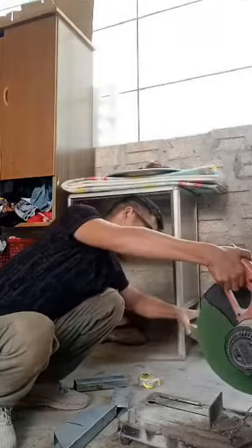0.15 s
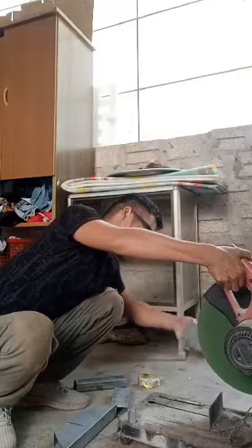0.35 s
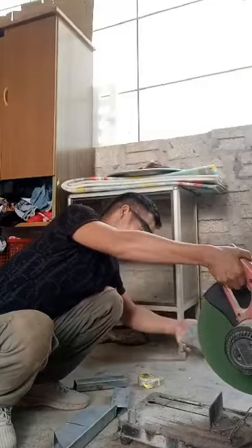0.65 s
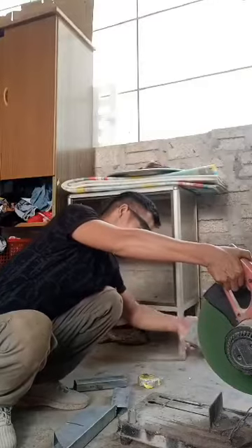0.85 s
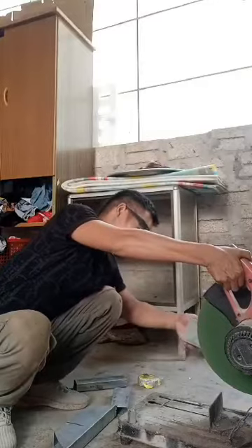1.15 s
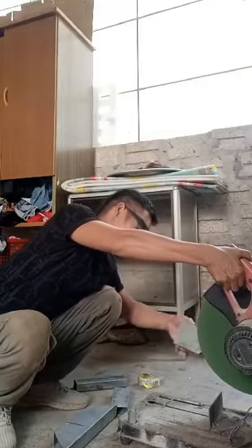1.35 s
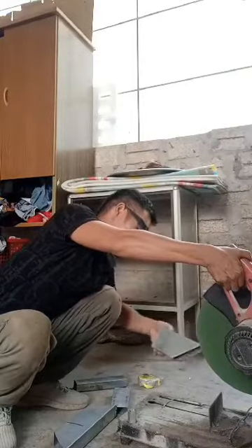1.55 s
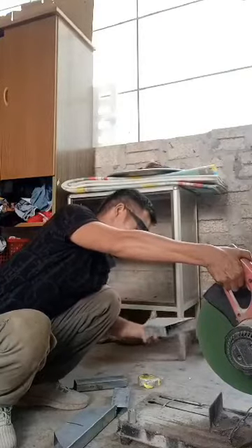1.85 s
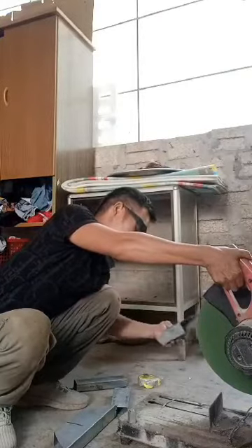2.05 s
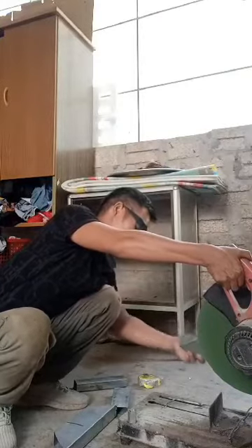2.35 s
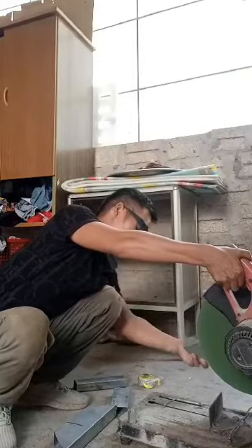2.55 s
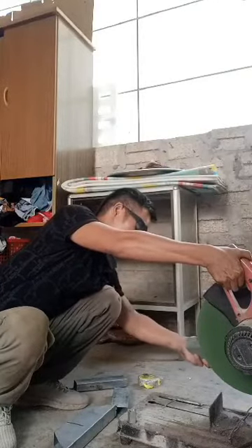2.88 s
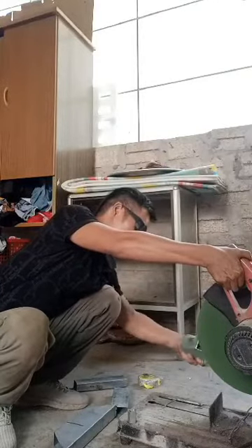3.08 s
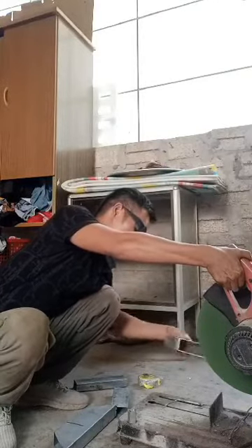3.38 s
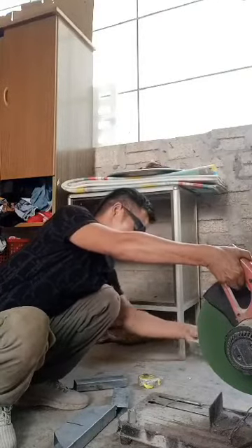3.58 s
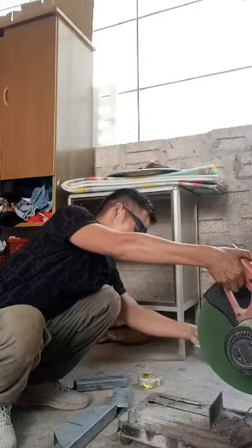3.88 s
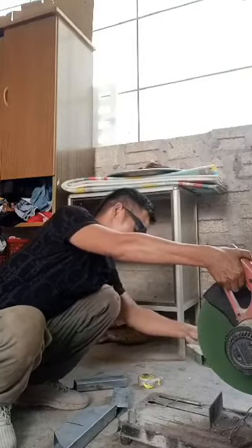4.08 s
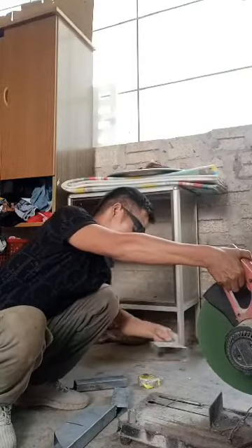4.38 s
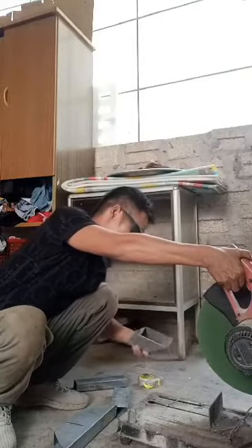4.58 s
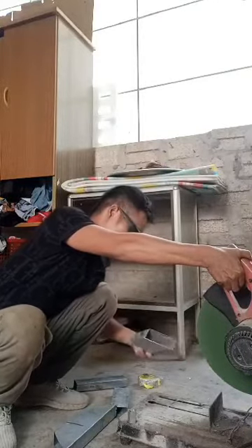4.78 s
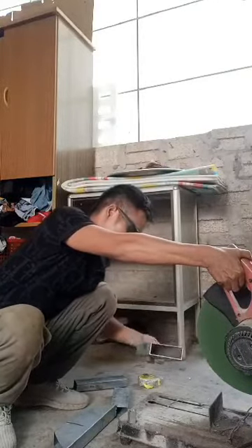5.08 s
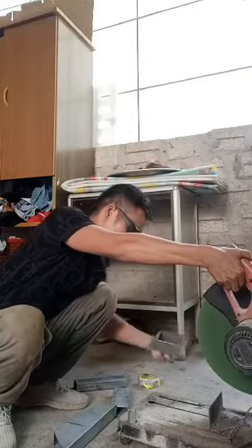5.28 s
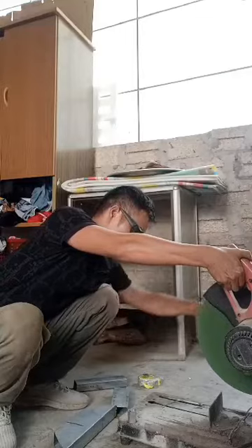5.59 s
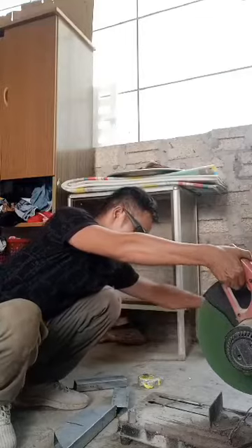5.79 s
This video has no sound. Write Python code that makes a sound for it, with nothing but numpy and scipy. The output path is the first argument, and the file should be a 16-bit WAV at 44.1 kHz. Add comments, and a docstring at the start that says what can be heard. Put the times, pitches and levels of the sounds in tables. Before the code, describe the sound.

In a small workshop, a steel tube scrapes briefly against the spinning wheel of a cut-off saw. The motor is blipped on with a thump and a rising whine, then coasts with a fast rattle. Three such blips are each followed by another hissing, ringing, squealing pass of the tube. The saw then rattles on alone until a fourth blip. The sound is in stereo and seems close.

```python
"""An abrasive cut-off saw is coasting in a small workshop, a steel tube pressed against its wheel:
grit hisses, the tube rasps, rings and squeals, and the frame rumbles. The tube is drawn back, and the
slack drive rattles in surges as it slows. Then the motor is switched on for a blip, which jolts the
housing and winds up the gear whine and the rush of air. Three such blips are each followed by another
pass of the tube. After the last pass the saw coasts and rattles, until a fourth blip ends the scene."""
import sys
import numpy as np
from scipy import signal
from scipy.fft import rfft, irfft
from scipy.io import wavfile
from scipy.ndimage import uniform_filter1d, map_coordinates

SR = 44100
rng = np.random.default_rng(int(sys.argv[2]) if len(sys.argv) > 2 else 0)


def dump_mix(stems):
    """Bounce the given channels to the path in sys.argv[1] as a 16-bit WAV at rate SR."""
    frames = np.atleast_2d(stems).T  # one column per channel
    limited = np.clip(frames, -1, 1)  # hard clip at full scale
    pcm = np.round(limited * 32767).astype(np.int16)
    wavfile.write(sys.argv[1], SR, pcm)


N = 261954
T = np.arange(N) / SR
HZ = np.fft.rfftfreq(N, 1 / SR)


def amp(db):
    """Amplitude ratio of a level in decibels."""
    return 10 ** (np.asarray(db) / 20)

def follow(points):
    """Linear interpolation of (time, value) points at every sample."""
    return np.interp(T, *np.transpose(points))

def spectrum(points):
    """Interpolation of (frequency, value) points on a logarithmic frequency axis."""
    hz, value = np.transpose(points)
    return np.interp(np.log(HZ + 1), np.log(hz + 1), value)

def modes(rows):
    """Modal superposition: second-order resonances summed with alternating sign."""
    return sum((-1) ** k * amp(db) * 1j * HZ * width / (hz ** 2 - HZ ** 2 + 1j * HZ * width)
               for k, (hz, width, db) in enumerate(rows))

def wander(rate_hz):
    """Random modulation: low-passed noise of rms 1."""
    x = irfft(rfft(rng.standard_normal(N)) / (1 + (HZ / rate_hz) ** 4), N)
    return x / x.std()

def wander_pair(rate_hz):
    """Two independent random modulations."""
    return np.array([wander(rate_hz), wander(rate_hz)])

def noise():
    """Two uncorrelated white noises."""
    return rng.standard_normal((2, N))

def levelled(x, seconds):
    """Division by the running rms, so that the driving force alone sets the level."""
    return x / np.sqrt(abs(uniform_filter1d(x.mean(0) ** 2, int(seconds * SR) + 1)) + 1e-9)

def swell(start, rise, hold, fall):
    """Envelope with a linear rise, and exponential decay from `hold` seconds after its start."""
    return np.clip((T - start) / rise, 0, 1) * np.exp(-np.clip((T - start - hold) / fall, 0, 50))

# Balance of the two microphone ports: (frequency [Hz], left minus right [dB])
PORT_BALANCE = [(60, .5), (280, .5), (420, 2.7), (600, 0.1), (990, -1), (1650, 2), (2750, 3.3), (4000, 4),
                (4850, 2.7), (5200, 6.5), (5800, 10.5), (6500, 10.5), (7300, 4.5), (7800, -2), (8700, -10),
                (9800, -6), (12000, 0.3)]
# Likeness of the two ports: (frequency [Hz], coherence [0-1])
PORT_COHERENCE = [(50, .3), (150, .35), (350, .85), (550, .6), (900, .35), (1400, .45), (2500, .3),
                  (4500, .05), (13000, 0)]
def heard(pair, response=1, normalise=True):
    """Partial coherence: two signals are filtered and mixed to stereo, by default to a mid rms of 1."""
    a, b = rfft(pair) * response
    coherence, tilt_db = np.clip(spectrum(PORT_COHERENCE), 0, 1), spectrum(PORT_BALANCE)
    left = a * amp(tilt_db / 2)
    right = (coherence * a + np.sqrt(1 - coherence ** 2) * b) * amp(-tilt_db / 2)
    x = irfft(np.array([left, right]), N)
    return x / x.mean(0).std() if normalise else x

def speed(first_hz=470.6, coast_s=7.94, cut_drag_per_s=.083):
    """Motor turns per second: each start winds them up; drag, greater in a cut, makes them decay."""
    grinding_s = sum(np.clip(T - start, 0, end - start) for start, _, end, *_ in PUSHES)
    slowing = T / coast_s + cut_drag_per_s * grinding_s
    hz = first_hz * np.exp(-slowing)
    for start, _, _, top_hz, spin_up, *_ in STARTS:
        wound = np.clip((T - start) / spin_up, 0, 1)
        lost = np.maximum(slowing - np.interp(start + spin_up, T, slowing), 0)
        hz = (1 - wound) * hz + wound * top_hz * np.exp(-lost)
    return hz

def with_speed(exponent, nominal_hz=473):
    """Power law of amplitude against motor speed."""
    return (speed() / nominal_hz) ** exponent

def powered():
    """Extra excitation while the motor draws current."""
    return sum(amp(db) * swell(start - CLASH_LEAD_S, 0.018, spin_up, 0.11)
               for start, _, _, _, spin_up, db, _ in STARTS)

# Modes of the sheet-metal casing: (frequency [Hz], bandwidth [Hz], gain [dB])
CASING_MODES = [(1800, 49, 1.5), (1966, 30, 0.5), (2170, 33, 1.5), (2370, 45, 0), (2786, 37, 2),
                (3230, 61, 0.5), (3475, 80, 0), (3830, 60, 0), (4100, 26, -18), (4970, 30, 1),
                (5600, 54, -3), (6040, 54, -3)]
def casing():
    """Resonant transmission: sound from inside the machine picks up the ring of its casing."""
    return np.sqrt(1 + 2 * abs(modes(CASING_MODES)) ** 2)

# Spectrum of the rushing air: (frequency [Hz], relative level [dB])
AIR_SPECTRUM = [(30, -44), (95, -12.5), (140, -14.5), (300, -9), (420, 0), (750, -0.5), (1200, -2.5),
                (1850, -5.5), (2350, -3), (2600, -5), (2800, -2.5), (3450, -1), (3900, -.5), (5000, .5),
                (5900, 0), (7000, -3), (8000, -21.5), (8900, -12), (10000, -29.5), (13000, -52)]
def air(level_db=-30):
    """Turbulence at fan and wheel makes broadband noise, growing with speed and under current."""
    rush = np.hypot(amp(level_db) * with_speed(1.33), powered())
    flutter = amp(.6 * wander(60))
    return rush * flutter * heard(noise(), amp(spectrum(AIR_SPECTRUM)) * casing())

# Armature harmonics, from the seventh upward: (relative level [dB])
ARMATURE_HARMONICS = [3, 7.5, 1, 0, -10, -18, -4.5]
def armature(turns, level_db=-43, fading_db=8):
    """A harmonic series glides with the motor; each tone fades at random, as if crossing room modes."""
    tones = np.zeros((2, N))
    for order, db in enumerate(ARMATURE_HARMONICS, 7):
        fading = amp(db + fading_db * wander(5))
        tones += fading * np.cos(2 * np.pi * (order * turns + rng.random((2, 1))))
    return amp(level_db) * heard(tones)

# Tones of rotor and fan: (frequency [multiple of motor speed], level at nominal speed [dB])
ROTOR_TONES = [(1.197, -45.5), (1.888, -53), (2.394, -55.5)]
def rotor(turns):
    """Rotational tones waver, sag with the speed and grow as its cube."""
    tones = np.zeros((2, N))
    for order, db in ROTOR_TONES:
        phase = 2 * np.pi * order * turns + 1.2 * wander_pair(25)
        tones += amp(db + 4 * wander(7)) * heard(np.cos(phase))
    return with_speed(3) * tones

def housing_rolloff(cutoff_hz=3500):
    """Low-pass radiation: the heavy housing gives off little treble."""
    return 1 / (1 + (HZ / cutoff_hz) ** 4)

# Modes of the motor housing: (frequency [Hz], bandwidth [Hz], gain [dB])
HOUSING_MODES = [(404.7, 4.2, -7), (465.3, 26, 0), (494.4, 38, -4.5), (561, 42, -8), (630.4, 17.4, -1),
                 (765, 25, -12.5), (870, 9.4, -12.5), (925, 7.6, -3.5), (1070, 54, -10)]
def drone(rattle, level_db=-36.5, braced_db=-10):
    """Forced vibration of the housing grows with speed, current and surges; the tube's bracing damps it."""
    brace = pressing(RUMBLE, growth=1, release=0.77)
    running = amp(level_db + braced_db * brace / brace.max()) * with_speed(1.2)
    kicks = surging(rattle, GEAR_RING, rise=0.01, hold=0.006, fall=0.017)
    shake = np.hypot(running, amp(-6) * np.hypot(powered(), kicks))
    return shake * levelled(heard(noise(), modes(HOUSING_MODES) * housing_rolloff()), 0.062)

# Modes of the wheel guard: (frequency [Hz], bandwidth [Hz], gain [dB])
GUARD_MODES = [(1274, 28, -11.5), (1354, 27, -1.5), (1441, 15.5, -5), (1486, 12.3, -2), (1543, 12, 2.5),
               (1612, 13.6, 2)]
# Course of the steady gear whine: (time [s], relative level [dB])
WHINE_LEVEL = [(0, -31.5), (.6, -29.5), (1.1, -30), (1.35, -36), (1.68, -31), (2.08, -30.5), (2.18, -23.5),
               (2.27, -26), (2.42, -31.5), (2.6, -25.5), (2.87, -24.5), (3.15, -27.5), (3.7, -26.5),
               (4.15, -30), (4.33, -39), (4.52, -28), (5.94, -29)]
def whine(turns, rattle, gear_order=3.12, direct=.16, knocking=.85):
    """Phase modulation: gear teeth mesh unevenly and ring the guard; the rattle drives them harder."""
    phase = 2 * np.pi * gear_order * turns + 1.4 * wander_pair(80)
    flutter = amp(2.5 * wander(25) - .4)
    mesh, guard = np.cos(phase), modes(GUARD_MODES)
    tone = heard(mesh, guard) + direct * heard(mesh) + knocking * heard(noise(), guard)
    octave = amp(-15) * heard(np.cos(2 * phase))
    steady = flutter * amp(follow(WHINE_LEVEL) - 5)
    kicks = amp(1) * surging(rattle, GEAR_RING, rise=0.0073, hold=0.019, fall=0.0092)
    return (levelled(tone, 0.074) + octave) * np.hypot(steady, kicks)

# Spells of rattle in the slack drive:
# (first surge [s], last surge [s], approximate rate [1/s], clatter [dB], gear ring [dB])
RATTLES = [ (0.39, .47, 14, -33, -46), (0.862, 0.891, 17, -24, -27), (1.076, 1.09, 17, -19, -31),
           (1.759, 1.756, 17, -30, -35), (1.88, 2.121, 16.6, -20.5, -32.5), (2.45, 2.756, 16.8, -18, -29.5),
           (2.807, 2.855, 18, -25, -25), (3.37, 3.553, 16.7, -19, -36), (4.438, 4.602, 18.3, -21.5, -29.5),
           (4.652, 4.986, 18.3, -24, -35), (5.02, 5.416, 17.4, -25.5, -38.5),
           (5.549, 5.799, 13.3, -32, -34), ]
CLASH_LEAD_S = 0.024  # the gears take up their slack just before each jolt
CLATTER, GEAR_RING = 1, 2  # level columns of a surge, after its time
def surges(jitter_s=.002, uneven_db=1.2, clash_ring_db=-27):
    """Backlash: the drive clashes once at each start and surges in nearly even trains as it slows."""
    events = [(start - CLASH_LEAD_S, clash_db, clash_ring_db) for start, *_, clash_db in STARTS]
    for first, last, per_s, clatter_db, ring_db in RATTLES:
        for time in np.linspace(first, last, round(abs(last - first) * per_s) + 1):
            late_s, harder_db, brighter_db = rng.standard_normal(3) * (jitter_s, uneven_db, uneven_db)
            events.append((time + late_s, clatter_db + harder_db, ring_db + brighter_db))
    return events

def surging(rattle, column, rise, hold, fall):
    """Convolution of the surge impulses with one envelope gives the rattle's strength over time."""
    rows = np.array(rattle)
    onsets = np.clip(rows[:, 0] * SR, 0, N - 1).astype(int)
    impulses = np.bincount(onsets, amp(rows[:, column]), N)
    return signal.oaconvolve(impulses, swell(0, rise, hold, fall)[:SR // 4])[:N]

# Spectrum of the knocks in the drive: (frequency [Hz], relative level [dB])
CLATTER_SPECTRUM = [(60, -22), (200, -17), (480, -22), (900, -14), (2000, 2), (3400, 7.5), (4700, 6),
                    (6300, 1), (7300, 2.5), (8000, -9), (9000, -3.5), (12000, -64)]
def clatter(rattle, level_db=-11):
    """Impact noise: each surge is a cluster of small knocks, merged into a rough burst."""
    uneven = amp(1.8 * wander(400))
    knocks = heard(noise() * uneven, amp(spectrum(CLATTER_SPECTRUM)) * casing())
    return amp(level_db) * surging(rattle, CLATTER, rise=.008, hold=.022, fall=.013) * knocks

def inrush_hum(level_db=-49, mains_hz=50):
    """Magnetic force pulls twice in each mains cycle, so the inrush of current hums briefly."""
    inrush = sum(swell(start, 0.057, 0.13, .03) for start, *_ in STARTS)
    pull = 2 * np.pi * 2 * mains_hz * T + wander(27)
    return amp(level_db) * inrush * (np.sin(pull) + np.sin(2 * pull))

# Motor starts: (time [s], jolt [dB], hold [s], speed reached [turns/s], spin-up [s],
# rush of air [dB], gear clash [dB])
STARTS = [ (0.634, -24.5, 0.023, 517, 0.18, -34.5, -33), (2.2, -23, 0.028, 540, .17, -27.5, -20),
          (3.646, -22.5, 0.028, 566, .22, -28, -17), (5.869, -22, 0.0083, 590, 0.19, -29.5, -28), ]
# Modes of the jolted housing: (frequency [Hz], bandwidth [Hz], gain [dB])
JOLT_MODES = [(100, 37, -34), (179, 12, -8), (385, 9.5, -17), (454, 83, 6), (610, 43, -5), (690, 60, 3.5)]
def jolts(boom_hz=464.4):
    """Transient excitation: the starting torque sets the housing booming in its lowest strong mode."""
    torque = sum(amp(db) * swell(start, 0.0052, hold, 0.027) for start, db, hold, *_ in STARTS)
    boom = heard(np.cos(2 * np.pi * boom_hz * T + .4 * wander_pair(30)))
    shudder = levelled(heard(noise(), modes(JOLT_MODES) * housing_rolloff()), 0.037)
    return torque * (0.93 * boom + 0.41 * shudder)

# Pushes of the tube against the wheel, with relative levels: (start [s], bite-in [s], end [s],
# growth [dB], grit [dB], rasp [dB], rumble [dB], ring [dB], squeal [dB], squeal pitch [Hz],
# place of contact [0 rim, 1 corner, 2 flank])
PUSHES = [ (0.0, 0.0015, .285, 1.5, -23, -29, -53, -16.5, -26.5, 5150, 0.03),
          (.90, 0.24, 1.244, -8.5, -22.5, -27, -55, -23, -20, 5080, 1.17),
          (1.25, 0.035, 1.375, 0, -21.5, -26.5, -38, -20.5, -17.5, 5120, 1),
          (1.39, 0.012, 1.605, 1, -21, -24, -37.5, -19, -27, 5110, 0.98),
          (2.802, 0.0059, 2.84, 7, -23.5, -46, -48, -19.5, -29, 5060, 1.6),
          (2.88, 0.022, 3.275, 7.5, -19, -22.5, -48, -18, -26, 5070, 1.97),
          (3.808, 0.027, 3.858, -5, -26, -23, -39, -20.5, -26, 4970, 1.8),
          (3.912, 0.0084, 3.97, -0.5, -23, -18.5, -39.5, -25.5, -32, 5030, 1.6),
          (3.97, .015, 4.388, 3, -18.5, -22.5, -43, -24, -26, 5075, 1.4), ]
GRIT, RASP, RUMBLE, RING, SQUEAL, SQUEAL_PITCH, PLACE = range(4, 11)
def pressing(column, growth, release, inertia=1):
    """Pushes add in power as each bites in, holds and lets go; the factors scale growth, fall and rise."""
    power = np.zeros(N)
    for push in PUSHES:
        start, bite, end, growth_db = push[:4]
        to_come = np.clip((end - T) / (end - start), 0, 1)
        force = amp(push[column] - growth * growth_db * to_come)
        power += (force * swell(start, inertia * bite, end - start, release * 0.048)) ** 2
    return np.sqrt(power)

def contact(column):
    """Interpolation of one column of the pushes: held during each, gliding to the next."""
    return follow([(time, push[column]) for push in PUSHES for time in (push[0] + push[1], push[2])])

# Spectrum of the shaking frame: (frequency [Hz], relative level [dB])
RUMBLE_SPECTRUM = [(20, -32), (50, -23), (75, -2.5), (140, 0.5), (220, -0.5), (350, -2.5), (700, -8.5),
                   (1500, -44)]
def rumble():
    """Structure-borne sound: the frame answers each push sluggishly with low noise."""
    force = pressing(RUMBLE, growth=0.14, release=0.45, inertia=3.1)
    return force * heard(noise(), amp(spectrum(RUMBLE_SPECTRUM)))

def squeal(level_db=-4, overtone_ratio=1.53, overtone_db=-11):
    """Stick-slip friction keeps two bending modes of the tube singing; their pitch shifts with the grip."""
    hz = contact(SQUEAL_PITCH) + 11 * wander(9)
    phase = 2 * np.pi * np.cumsum(hz) / SR + .8 * wander_pair(36)
    catching = amp(3.5 * wander(16) - 1)
    tone = heard(np.cos(phase) + amp(overtone_db) * np.cos(overtone_ratio * phase))
    return amp(level_db) * catching * pressing(SQUEAL, growth=.3, release=1) * tone

def drifting(x, depth_s=.00017):
    """Frequency modulation by a varying delay: the shifting grip bends the tube's modes slightly."""
    positions = (T + depth_s * wander(6)) * SR
    return np.array([map_coordinates(side, [positions], order=3, mode="mirror") for side in x])

# Modes of the steel tube, by place of contact:
# (frequency [Hz], half-width [Hz], gain at rim [dB], gain at corner [dB], gain at flank [dB])
TUBE_MODES = [ (2625, 20, -16, -3, -4), (2742, 34, -2, -13, -1), (3090, 15, 4, -4, -4),
              (3192, 29, 2, -5.5, -2.5), (3470, 56, -7, -5.5, -4), (3620, 41, 4, -4.5, -11),
              (3770, 20, -6, -23, -4), (3935, 20, 1, 1, -0.5), (4058, 26, 4, -9, -6),
              (4220, 34, -1, -2.5, -9), (4328, 16, 0, 1, 2), (4590, 63, 3.5, -4, 2),
              (4820, 18, -14, -10, -5), (5342, 30, -1, 3, -1), (5635, 22, -1, -7, -1),
              (5770, 29, 8, 2.5, 2), (6100, 22, 1, 0, 2.5), (6215, 50, 0, -14, 4), (6410, 65, -4, 0, 7),
              (6550, 55, -3, -1.5, -3.5), (6890, 34, 2, -5, 9), (6970, 13, 5, -6, 1), (7570, 35, 0, 1, -12),
              ]
RIM, CORNER, FLANK = range(3)
def tube_response(place, rows=TUBE_MODES):
    """Light damping gives narrow Lorentzian peaks with deep valleys between them."""
    return sum(amp(gains_db[place]) / (1 + ((HZ - hz) / width) ** 2) for hz, width, *gains_db in rows)

def ringing(level_db=-2.5):
    """The driving point selects the tube's modes; they take turns as the grip shifts, and ring on."""
    place, ring = np.clip(contact(PLACE), RIM, FLANK), 0
    for spot in (RIM, CORNER, FLANK):
        near = np.sqrt(np.maximum(1 - abs(place - spot), 0))
        for group in (TUBE_MODES[::2], TUBE_MODES[1::2]):
            shifting = amp(6 * wander(13))
            ring += near * shifting * heard(noise(), tube_response(spot, group), normalise=False)
    return amp(level_db) * pressing(RING, growth=0.67, release=1.35) * levelled(drifting(ring), 0.032)

def tube_walls(x, depth_db=11):
    """High modal density: which of the thin walls' close modes speak changes as the contact slides."""
    frames = signal.stft(x, nperseg=2048, noverlap=1536)[2]
    patches = uniform_filter1d(rng.standard_normal(frames.shape[1:]), size=4, axis=0)
    patches = uniform_filter1d(patches, size=9, axis=1)
    speaking_db = depth_db * np.tanh(.9 * patches / patches.std())
    return signal.istft(frames * amp(speaking_db), nperseg=2048, noverlap=1536)[1][:, :N]

def grain_strikes(grains_per_s=12000, spread_db=2, dust=0.74):
    """Shot noise: coarse grains strike the tube's walls at random, over a hiss of fine dust."""
    sizes = amp(spread_db * np.minimum(rng.exponential(1, (2, N)), 3))
    grains = (rng.random((2, N)) < grains_per_s / SR) * sizes * noise()
    return tube_walls(grains / grains.std() + dust * noise())

# Spectrum of the rasping walls: (frequency [Hz], relative level [dB])
RASP_SPECTRUM = [(200, -25), (600, -3.5), (1100, 3.5), (2200, 3), (2700, 1.5), (3500, 5), (4400, 4),
                 (5000, -16), (7000, -71)]
def rasp(strikes, level_db=-3, unsteady_db=2):
    """Forced response of the walls to the strikes, strongest near the tube's modes."""
    walls = amp(spectrum(RASP_SPECTRUM)) * (.8 + tube_response(CORNER) + tube_response(FLANK))
    force = amp(level_db + unsteady_db * wander(16)) * pressing(RASP, growth=0.39, release=0.33)
    return force * levelled(heard(strikes, 1j * walls), 0.41)  # in quadrature with the grit

# Spectrum of the hissing grit: (frequency [Hz], relative level [dB])
GRIT_SPECTRUM = [(2000, -24.5), (4000, -69), (4800, -4.5), (5200, 0.5), (5900, -0.5), (6400, 0.5),
                 (6950, 0), (7400, -4.5), (8100, -8.5), (8800, -5), (9700, -18), (11000, -19.5),
                 (13000, -45)]
def grit(strikes):
    """Abrasion: the very brief impacts of the grains radiate a high hiss."""
    hiss = levelled(heard(strikes, amp(spectrum(GRIT_SPECTRUM))), 0.027)
    return pressing(GRIT, growth=0.76, release=1) * hiss

def grinding(chatter_db=0.8):
    """Amplitude modulation: the wheel's uneven bite shakes all sounds of the cut together."""
    bite = amp(chatter_db * wander(61))
    strikes = grain_strikes()
    return bite * (grit(strikes) + rasp(strikes) + rumble() + ringing() + squeal())

def scene():
    """Superposition of the running machine, its starts and the cut."""
    turns, rattle = np.cumsum(speed()) / SR, surges()
    motor = whine(turns, rattle) + rotor(turns) + armature(turns) + drone(rattle) + air()
    return motor + clatter(rattle) + jolts() + inrush_hum() + grinding()

def record(dry):
    """Soft saturation rounds the highest peaks; a low-pass filter limits the band."""
    knee, headroom, cutoff_hz = .6, .27, 13200
    over = np.maximum(abs(dry) - knee, 0)
    rounded = np.clip(dry, -knee, knee) + np.sign(dry) * headroom * np.tanh(over / headroom)
    lowpass = signal.firwin(301, cutoff_hz, window=("kaiser", 9), fs=SR)
    return signal.oaconvolve(rounded, lowpass[None], "same")


dry = scene()
out = record(dry)
dump_mix(out)
```